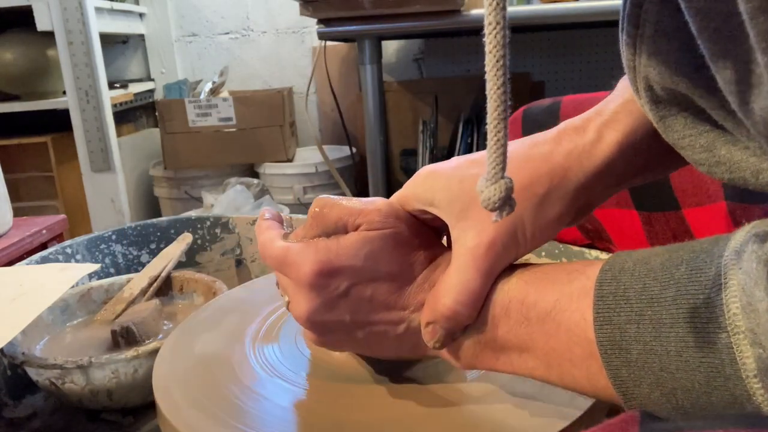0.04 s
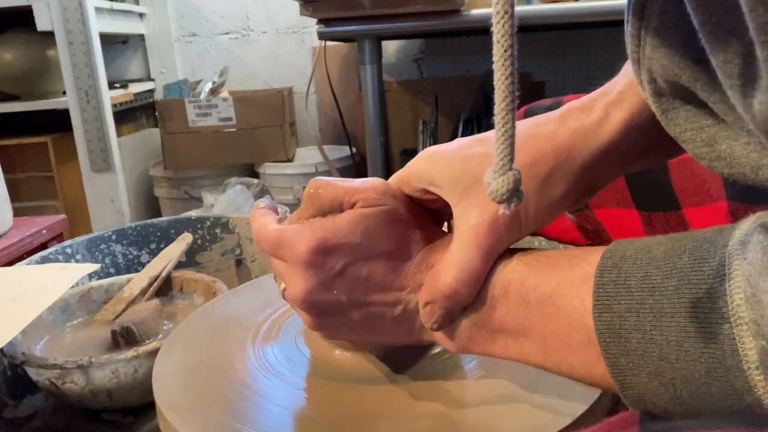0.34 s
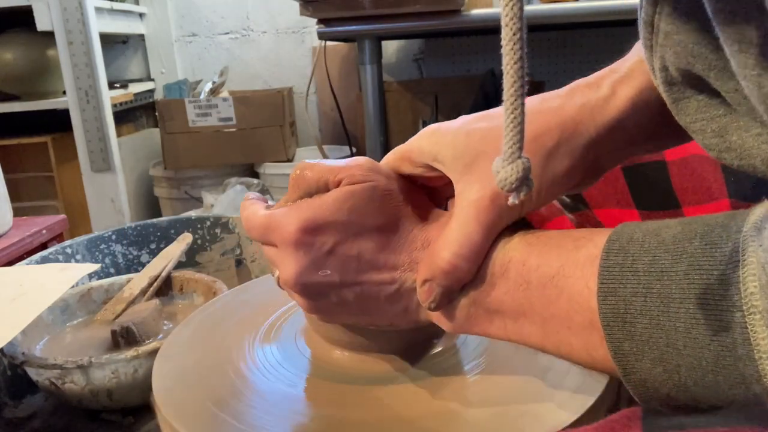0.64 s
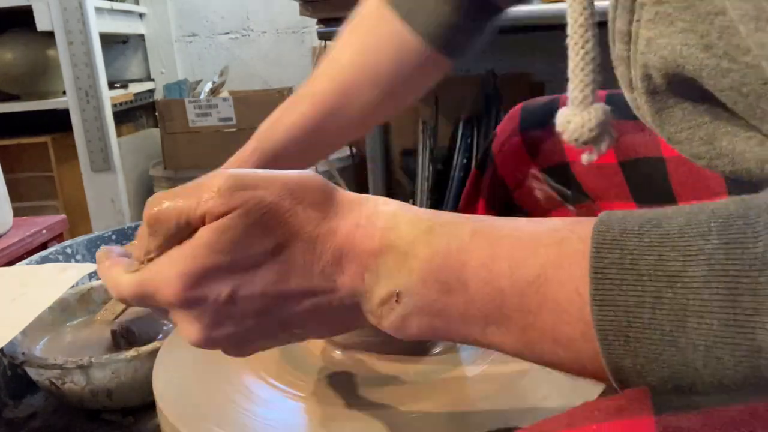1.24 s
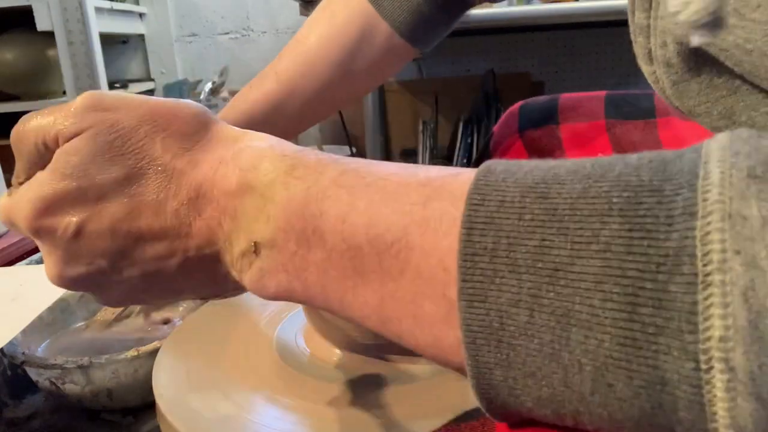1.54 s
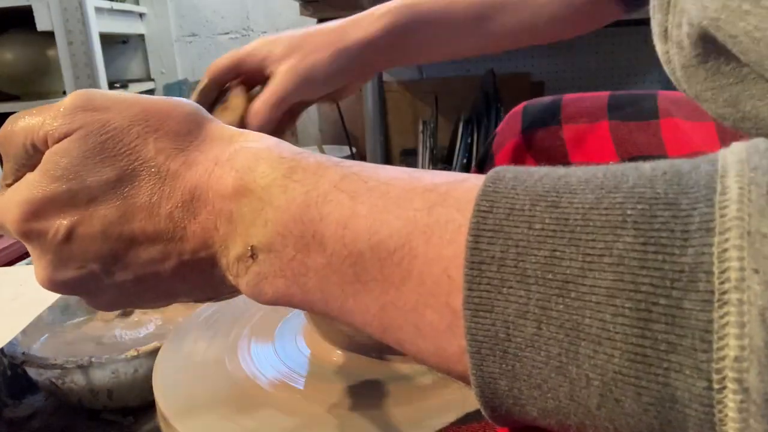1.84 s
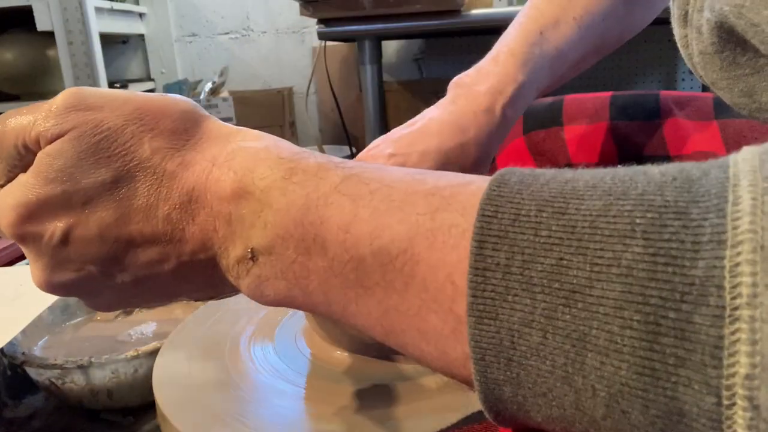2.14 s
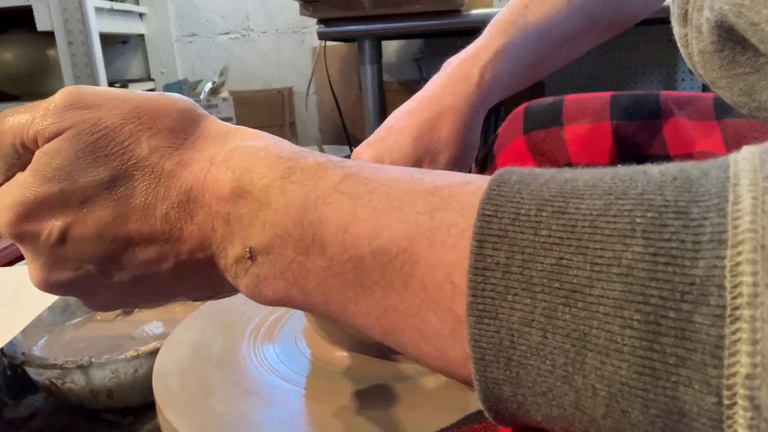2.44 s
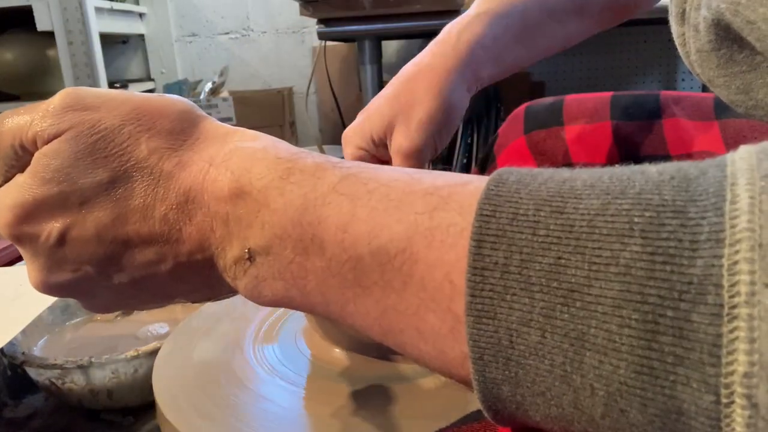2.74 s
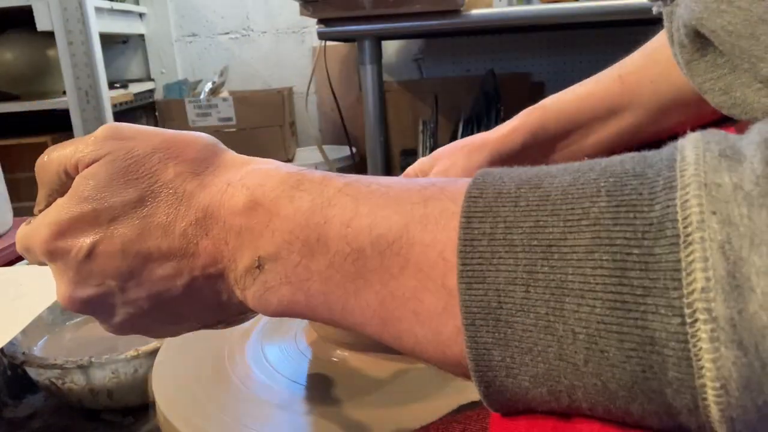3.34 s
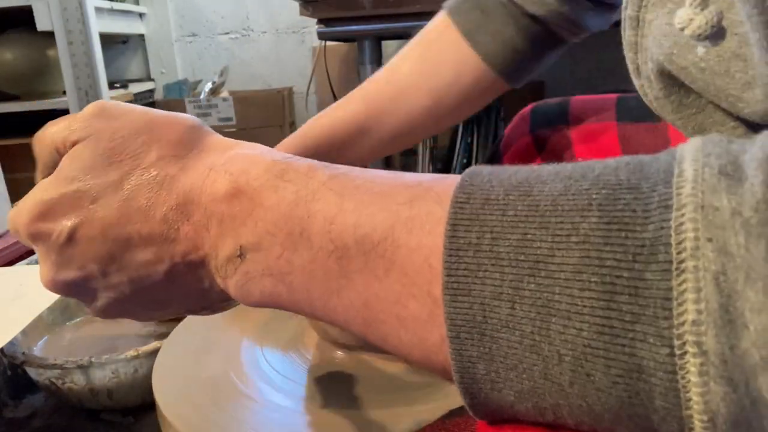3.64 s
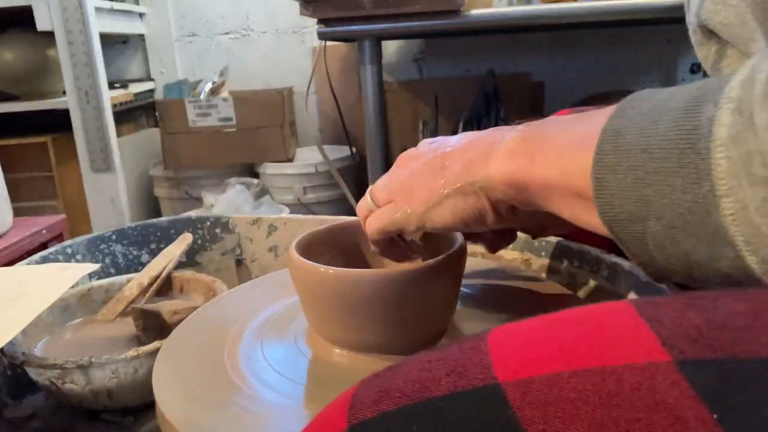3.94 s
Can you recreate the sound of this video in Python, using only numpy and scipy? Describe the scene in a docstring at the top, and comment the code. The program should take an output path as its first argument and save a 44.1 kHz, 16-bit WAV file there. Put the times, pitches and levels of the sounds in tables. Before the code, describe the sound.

A pottery wheel motor runs with a throbbing hum as wet clay briefly, softly squelches.

```python
"""Potter's wheel in a small studio

An electric wheel runs close by, its motor humming on mains overtones. Every shaft turn makes the hum
throb, the gear whine waver and the drive rumble and rub. Faint ticks come and go at their own,
slightly faster pace. Wet clay swishes round with the wheel head, and a wet hand lets go of the pot
with a short, bubbly squelch. A soft hiss of room air lies underneath."""
import sys
import numpy as np
from scipy import signal
from scipy.fft import rfft, irfft
from scipy.io import wavfile
from scipy.ndimage import uniform_filter1d

SR = 44100
rng = np.random.default_rng(int(sys.argv[2]) if len(sys.argv) > 2 else 0)


def dump(signal):
    """Clip the signal to [-1, 1] and save it as 16-bit WAV at the path in sys.argv[1]."""
    limited = np.clip(np.atleast_2d(signal).T, -1, 1)
    pcm = np.round(limited * 32767).astype(np.int16)
    wavfile.write(sys.argv[1], SR, pcm)


N = 176400

MAINS_HZ, SHAFT_HZ = 59.925, 8.55
THROB_AT_S, FASTEST_AT_S = 0.013, 0.061  # a moment of loudest hum; a moment of highest speed
# main hum (multiple of the mains, level [dB], left-right [dB], share of the throb [0-1])
MAIN_HUM = [(8, -52.5, 4.5, 1)]
# upper hum (multiple of the mains, level [dB], left-right [dB], share of the throb [0-1])
UPPER_HUM = [(16, -67.5, -1.5, 0.071), (24, -81, -0.5, 0.27), (32, -71.5, 4, 0.63), (48, -90, -5, 0.35)]
# low drone (multiple of the shaft rate, level [dB], left-right [dB], share of the throb [0-1])
SHAFT_DRONE = [(29, -79.5, 2.5, 1)]
# motor load (time [s], main hum gain [dB], throb depth [0-1], speed offset [%], speed swing [%],
# drone gain [dB])
MOTOR_LOAD = [(0, 1.5, 0.13, 0.39, 0.84, 1), (.45, 2, 0.21, .35, 0.96, -0.5),
              (1.15, 0, 0.12, .05, 0.62, -4.5), (1.6, -1.8, 0.7, -.05, 1.57, -6.5),
              (2.3, 0, 0.35, -.1, 0.99, -4.5), (2.8, -2, 0.42, -0.117, 1.1, 2.5),
              (3.25, 0, 0.38, -0.23, 1.1, 3), (3.6, -2, 0.76, -0.23, 1.3, 4.5),
              (4, 0.5, 0.15, -0.32, 1.06, 3.5)]
# upper hum easing as the hands let go; the rasp follows by half (time [s], gain [dB])
HAND_PRESSURE = [(0, 4), (1.2, 3), (1.6, 0), (4, -1.5)]
# body of the drive rumble (frequency [Hz], relative level [dB])
RUMBLE_COLOUR = [(100, -50.5), (150, -34), (180, -25), (215, -26), (250, -15.5), (280, -16), (330, -21),
                 (400, -23.5), (450, -11.5), (505, -3.5), (545, 0), (580, 6.5), (620, 0.5), (660, -11),
                 (700, -16.5), (780, -24.5), (1000, -42)]
# edge of the brushes and bearings (frequency [Hz], relative level [dB])
RASP_COLOUR = [(600, -19.5), (800, -7.5), (910, 2.5), (1040, 0.5), (1130, -5.5), (1240, 0), (1275, -5.5),
               (1325, 1), (1370, -4.5), (1430, -6.5), (1560, -2), (1660, -7.5), (1820, -3.5), (2030, -8),
               (2150, -12.5), (2400, -21.5), (3000, -28)]
# tight spots in the drive (position [turns], half length [turns], ring [Hz], width [Hz], level [dB],
# left-right [dB], roughness [0-1])
RUB_SPOTS = [(.26, 0.04, 596, 40, -54, 2.5, .5), (0.69, .05, 586, 40, -55.5, 2.3, .5),
             (0.07, .045, 570, 40, -59, 0.5, 0.86), (0.94, 0.069, 1290, 170, -66.5, 3, 1),
             (0.85, 0.087, 1535, 70, -65, -1, 0.75), (.07, 0.063, 1030, 110, -71, 0, 0.97),
             (0.23, 0.16, 1435, 40, -75, -0.5, .8)]
# gear tones at nominal speed (pitch [Hz], level [dB], left-right [dB], roughness [0-1])
GEAR_TONES = [(1896.7, -61.5, -1.5, .36), (1577, -70.5, -7, 0.5), (2005, -78, -10, 0.6),
              (3340, -90, -2, .6), (4330, -92, -2, .6)]
# drive ticks, paced slightly faster than the shaft, with gaps (time [s], relative level [dB])
DRIVE_TICKS = [(0.0234, -48), (0.1266, -51), (0.2296, -50.5), (0.3327, -51), (0.4353, -56), (.5377, -63.5),
               (0.6406, -55), (0.7436, -63), (.847, -50), (1.054, -55.5), (1.1578, -54.5), (1.3659, -65),
               (1.4676, -57.5), (1.5733, -54), (1.6765, -49), (1.7819, -54), (1.8863, -52.5), (1.9903, -58),
               (2.1974, -62.5), (2.3015, -63), (2.5097, -59.5), (2.614, -56), (2.7182, -58.5), (3.03, -52),
               (3.1333, -56.5), (3.2375, -60), (3.8616, -68)]
# bright ring of a tick (frequency [Hz], relative level [dB])
TICK_RING = [(2500, -15.5), (5000, -13.5), (6800, -9.5), (7900, -1.5), (8500, -1), (9500, -8.5),
             (10300, -16.5), (12400, -14), (14000, -21), (15500, -13.5)]
# clay swishes, about one a turn of the wheel head (time [s], half length [s], level [dB])
CLAY_SWISHES = [(0.263, 0.061, -72.5), (0.984, 0.0735, -72.5), (2.56, 0.067, -76), (3.301, 0.0675, -75.5)]
# sheen of sliding wet clay (frequency [Hz], relative level [dB])
CLAY_COLOUR = [(2000, -6.5), (3300, -5), (5500, -1), (7500, -1.5), (9500, -5), (12000, -23), (15500, -13.5)]
# squelch of the hand leaving the clay (time [s], level [dB])
SQUELCH_ENVELOPE = [(1.36, -100), (1.5, -76.5), (1.6, -83.5), (1.625, -69), (1.68, -63.5), (1.73, -71),
                    (1.775, -67), (1.82, -78), (1.9, -87), (1.96, -110)]
# wet tone of the squelch and the bubble snaps (frequency [Hz], relative level [dB])
SLIP_COLOUR = [(1500, -14), (2600, 4.5), (4000, -2), (6500, 3), (8500, 1), (11000, -5), (13500, 2),
               (15300, -2)]
# bubbles bursting in the slip (time [s], pitch [Hz], level [dB], decay [s])
SLIP_BUBBLES = [(1.524, 6450, -55.5, 0.0018), (1.537, 8540, -53, .002), (1.608, 13960, -54.5, 0.0014),
                (1.624, 14700, -50, .002), (1.636, 15000, -51, .0015), (1.656, 8520, -54, 0.002),
                (1.677, 2640, -49.5, 0.0025), (1.702, 7420, -55, 0.0023), (1.752, 2660, -54, 0.0041),
                (1.829, 7650, -60.5, .002), (1.87, 2710, -50.5, 0.0045)]
# room air and hiss (frequency [Hz], relative level [dB])
AIR_COLOUR = [(30, -2.5), (70, -7.5), (150, 1), (1500, 8), (2650, 9), (3100, 2.5), (3350, 8), (3900, 3),
              (4350, 7), (4800, 2), (5250, 8), (5800, -6), (6600, 1.5), (7100, 6.5), (7600, -4), (8450, 5),
              (9100, -6), (10700, -2.5), (12000, 0), (13500, -2.5), (15700, -7.5)]
# tilt of the diffuse part of the hiss (frequency [Hz], relative level [dB])
AIR_DIFFUSE = [(30, -14), (300, -12.5), (2000, -3.5), (4500, -11), (8000, -5), (15000, -1.5)]


def motor_hum(t, load_db, throb):
    """The motor hums on mains overtones; the upper ones soften as the hands let go."""
    main = undb(load_db) * tones(t, MAIN_HUM, MAINS_HZ, throb)
    upper = undb(curve(HAND_PRESSURE, t)[0]) * tones(t, UPPER_HUM, MAINS_HZ, throb)
    return main + upper


def drive(t, rumble_db=-58, rasp_db=-63):
    """Bearings and brushes shake the housing in a pattern that repeats with the shaft."""
    turns = SHAFT_HZ * t + .0012 * wander(3)
    beat = np.cos(2 * np.pi * SHAFT_HZ * (t - THROB_AT_S))
    flicker = undb(1.34 * wander(25.03) + .5 * curve(HAND_PRESSURE, t)[0])
    rumble = place(scrape(turns, repeat=.58), pan_db=1.3, side=.2 * scrape(turns, repeat=.58))
    rasp = place(scrape(turns, repeat=.3), pan_db=-.6, side=.14 * scrape(turns, repeat=.3))
    rumble = colour(rumble * undb(2.3 * beat), RUMBLE_COLOUR)
    rasp = colour(rasp * undb(beat) * flicker, RASP_COLOUR)
    return undb(rumble_db) * unit(rumble) + undb(rasp_db) * unit(rasp)


def rubs(t):
    """Tight spots come round with the shaft, and each makes the housing ring briefly."""
    out = 0
    for spot, half, hz, width_hz, db, pan_db, rough in RUB_SPOTS:
        turns_away = (SHAFT_HZ * t + .027 * wander(6.09) - spot + .5) % 1 - .5
        contact = np.exp(-.5 * (turns_away / half) ** 2)
        texture = np.sqrt(2) * (np.sqrt(1 - rough ** 2) + rough * grain(1.5 * width_hz))
        ring = (texture * np.exp(2j * np.pi * (hz * t + rng.random()))).real
        out += place(undb(db) * contact * ring, pan_db)
    return out


def gear_whine(t, offset_percent, swing_percent):
    """Gear tones rise and fall with the uneven speed of each turn."""
    swing = swing_percent * np.cos(2 * np.pi * SHAFT_HZ * (t - FASTEST_AT_S))
    speed = 1 + (offset_percent + swing + .1524 * wander(50)) / 100
    travel = np.cumsum(speed) / SR
    out = 0
    for hz, db, pan_db, rough in GEAR_TONES:
        tone = np.sqrt(2) * undb(db) * np.exp(2j * np.pi * hz * travel)
        direct = (tone * (1 + rough * grain(70))).real
        out += place(direct, pan_db, side=.28 * (tone * grain(70)).real)
    return out


def ticks(t, gain_db=-3, crack_s=.0016, tail_s=.011):
    """Tiny bright ticks keep their own pace, each with a short scatter from the room."""
    crack, tail = np.zeros((2, N))
    for at, db in DRIVE_TICKS:
        age = np.maximum(t - at, 0)
        crack += (age > 0) * undb(db) * np.exp(-age / crack_s)
        tail += (age > 0) * undb(db - 10.5) * np.exp(-age / tail_s)
    crack_noise, tail_noise, side_noise = rng.standard_normal((3, N))
    direct = crack_noise * crack + tail_noise * tail
    stereo = place(direct, pan_db=-3, side=side_noise * (tail + .5 * crack))
    return undb(gain_db) * colour(stereo, TICK_RING)


def clay_swish(t):
    """Wet clay swells into a fine crackle as it comes round."""
    swell = sum(undb(db) * np.exp(-.5 * ((t - at) / half) ** 2) for at, half, db in CLAY_SWISHES)
    film = place(crackle(12000, spread_db=2.2), pan_db=-1.6, side=.29 * crackle(8700, spread_db=1.8))
    return colour(film * swell, CLAY_COLOUR)


def hand_squelch(t):
    """The wet film fizzes as the hand peels off the pot."""
    film = place(fizz(), pan_db=-3.5, side=.59 * fizz())
    return colour(film * undb(curve(SQUELCH_ENVELOPE, t)[0]), SLIP_COLOUR)


def bubbles(t, sag_per_s=16, snap_db=-9, snap_s=.0023):
    """Each bubble snaps and rings for an instant, sagging in pitch."""
    ring, snap = np.zeros((2, N))
    for at, hz, db, decay in SLIP_BUBBLES:
        age = np.maximum(t - at, 0)
        cycles = hz * (1 - np.exp(-sag_per_s * age)) / sag_per_s
        ring += undb(db) * np.exp(-age / decay) * np.sin(2 * np.pi * cycles)
        snap += (age > 0) * undb(db + snap_db) * np.exp(-age / snap_s)
    return place(ring, pan_db=-4) + colour(snap * rng.standard_normal((2, N)), SLIP_COLOUR)


def shaft_drone(t, gain_db, throb, flicker_db=2):
    """The turning shaft lays a faint, unsteady low tone under the hum."""
    return undb(gain_db + flicker_db * wander(9.9)) * tones(t, SHAFT_DRONE, SHAFT_HZ, throb)


def air(gain_db=-74):
    """The room and the running machine make an even bed of hiss, wider in the treble."""
    mid, side = rng.standard_normal((2, N))
    hiss = place(mid, pan_db=-2, side=.77 * colour(side, AIR_DIFFUSE))
    return undb(gain_db) * colour(hiss, AIR_COLOUR)


def tones(t, rows, base_hz, throb):
    """Clean overtones of a steady rate that throb once a shaft turn."""
    beat = throb * (np.cos(2 * np.pi * SHAFT_HZ * (t - THROB_AT_S)) + .043 * wander(14))
    out = 0
    for multiple, db, pan_db, share in rows:
        tone = np.sqrt(2) * np.sin(2 * np.pi * (multiple * base_hz * t + rng.random()))
        out += place(tone * (1 + share * beat) * undb(db), pan_db)
    return out


def scrape(turns, repeat):
    """Noise of a rough track that comes round once a turn, blended with fresh noise."""
    track = rng.standard_normal(int(SR / SHAFT_HZ))
    looped = track[(turns % 1 * len(track)).astype(int)]
    return np.sqrt(repeat) * looped + np.sqrt(1 - repeat) * rng.standard_normal(N)


def crackle(per_s, spread_db):
    """Dense tiny bursts of a wet film; rms 1."""
    chance, size, sign = rng.random(N), rng.exponential(size=N), rng.choice([-1, 1], N)
    return unit((chance < per_s / SR) * sign * undb(spread_db * np.minimum(size, 4)))


def fizz(per_s=4000, spread_db=3.5, decay_s=.0008):
    """Countless tiny pockets of a wet film pop, each at its own pitch; rms 1."""
    age = np.arange(256) / SR
    out = np.zeros(N + len(age))
    for when, pitch, chance in rng.random((int(per_s * N / SR), 3)):
        start = int(when * N)
        size = undb(spread_db * min(-np.log(1 - chance), 4))
        pop = np.exp(-age / decay_s) * np.sin(2 * np.pi * (2000 + 14000 * pitch) * age)
        out[start:start + len(age)] += size * pop
    return unit(out[:N])


def wander(rate_hz):
    """Smooth random drift; rms 1."""
    hold = max(int(SR / rate_hz), 2)
    steps = np.repeat(rng.standard_normal(N // hold + 1), hold)
    return unit(uniform_filter1d(uniform_filter1d(steps, hold), hold)[:N])


def grain(rate_hz):
    """Random flutter of level and phase that roughens a tone."""
    return (wander(rate_hz) + 1j * wander(rate_hz)) / np.sqrt(2)


def colour(x, points):
    """EQ through (frequency [Hz], level [dB]) points, keeping the power of white noise."""
    hz, db = np.array(points, float).T
    log_hz = np.log(np.arange(N // 2 + 1) * SR / N + 1)
    beyond = np.maximum(np.log(hz[0]) - log_hz, 0) + np.maximum(log_hz - np.log(hz[-1]), 0)
    gain = undb(np.interp(log_hz, np.log(hz), db) - 40 * beyond)  # rolls off past both ends
    return irfft(rfft(x) * unit(gain), N)


def place(x, pan_db, side=0):
    """Left and right from a direct sound and its diffuse part."""
    return np.array([(x + side) * undb(pan_db / 2), (x - side) * undb(-pan_db / 2)])


def curve(rows, t):
    """Columns of a table, joined by straight lines in time."""
    times, *columns = np.array(rows, float).T
    return [np.interp(t, times, column) for column in columns]


def undb(db):
    """Decibels to gain."""
    return 10 ** (np.asarray(db) / 20)


def unit(x):
    """Scale to rms 1."""
    return x / np.sqrt(np.mean(x ** 2))


def scene():
    """Mix the motor under its load, the mechanics, the wet clay and the room."""
    t = np.arange(N) / SR
    load_db, throb, speed_offset, speed_swing, drone_db = curve(MOTOR_LOAD, t)
    motor = motor_hum(t, load_db, throb) + shaft_drone(t, drone_db, throb)
    mechanics = gear_whine(t, speed_offset, speed_swing) + drive(t) + rubs(t) + ticks(t)
    clay = clay_swish(t) + hand_squelch(t) + bubbles(t)
    return motor + mechanics + clay + air()


def record(dry):
    """A steep low-pass trims the very top."""
    top_hz = 15850
    return signal.sosfilt(signal.ellip(10, .2, 70, top_hz, fs=SR, output="sos"), dry)


dry = scene()
out = record(dry)
dump(out)
```